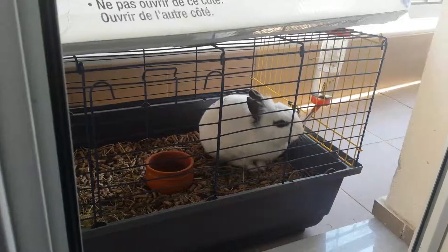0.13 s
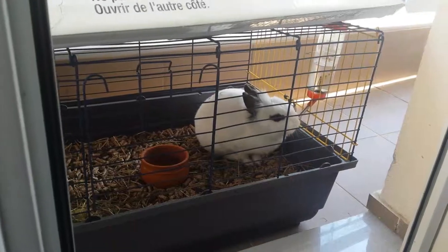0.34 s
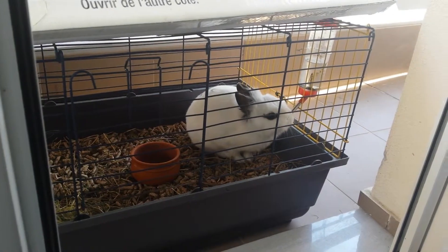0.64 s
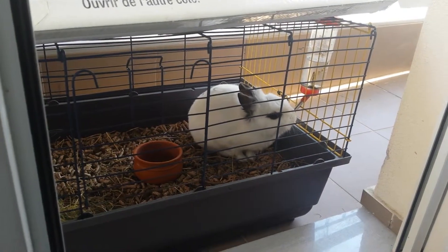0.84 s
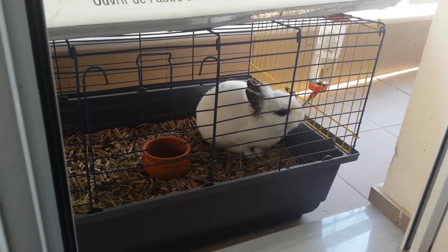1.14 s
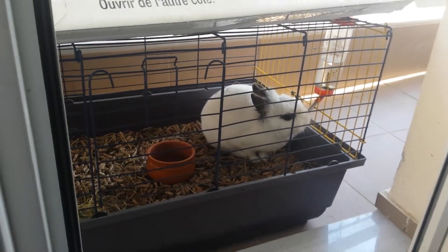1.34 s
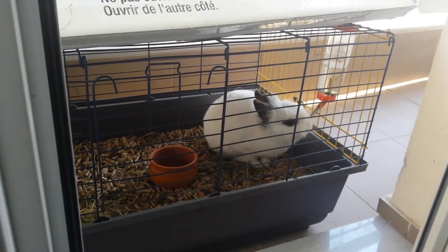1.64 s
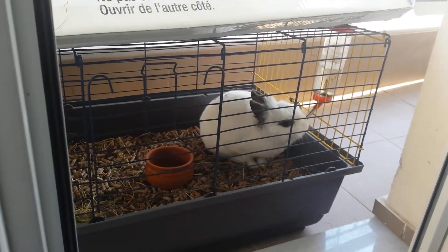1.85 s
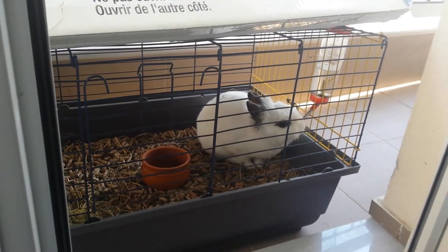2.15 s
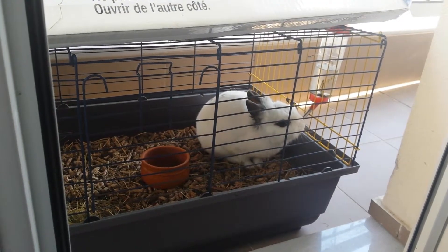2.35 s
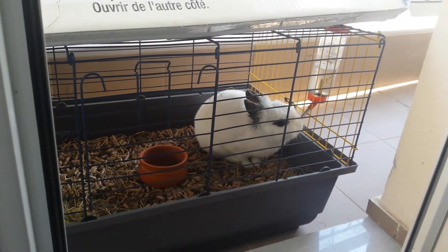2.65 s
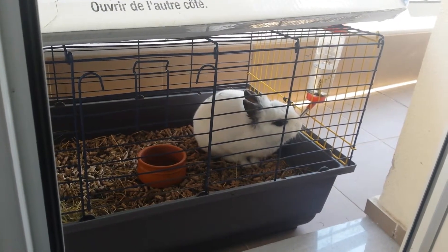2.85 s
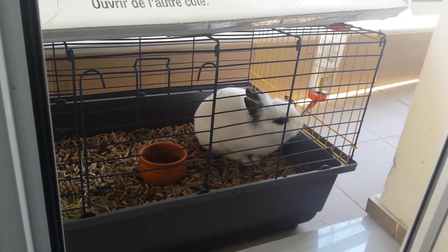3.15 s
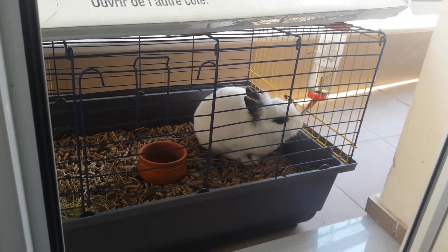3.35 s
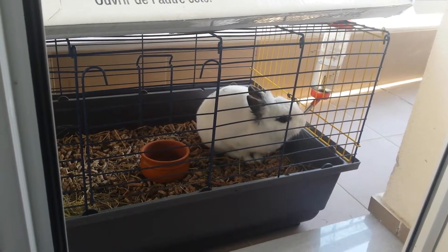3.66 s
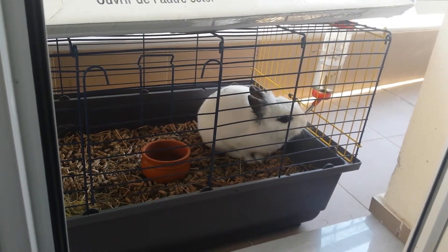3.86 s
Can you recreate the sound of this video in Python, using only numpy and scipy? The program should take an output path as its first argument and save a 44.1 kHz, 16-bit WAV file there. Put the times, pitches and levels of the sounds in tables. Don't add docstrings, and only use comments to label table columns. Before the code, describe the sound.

A rabbit licks a metal bottle spout in its cage. Silence until 0.4 s, then faint low traffic rumble and engine hum fade in. A sharp click at 0.7 s leads into light irregular ticks until 1.2 s. From about 1.6 s bright metallic knocks come five or six a second, many doubled by the ball dropping back, until 3.65 s; one faint tick follows at 3.8 s. Short hard balcony echo, stronger on the right.

```python
import sys
import numpy as np
from scipy import signal
from scipy.fft import rfft, irfft, next_fast_len
from scipy.io import wavfile
from scipy.ndimage import map_coordinates

SR = 44100
rng = np.random.default_rng(int(sys.argv[2]) if len(sys.argv) > 2 else 0)


def to_wav(s):
    ch = np.atleast_2d(s).T
    pcm = np.round(np.clip(ch, -1, 1) * 32767)
    wavfile.write(sys.argv[1], SR, pcm.astype(np.int16))


def gain_from_db(level_db):
    decades = np.asarray(level_db, float) / 20
    return 10 ** decades


N = 176400


def along(points, hz):
    point_hz, value = np.transpose(points)
    return np.interp(np.log(hz + 1), np.log(point_hz + 1), value)


def curves(rows):
    time_s, *columns = np.transpose(rows)
    return [np.interp(np.arange(N) / SR, time_s, column) for column in columns]


def wobble(rate_hz, size=N):
    knots = rng.standard_normal(int(size * rate_hz / SR) + 4)
    return map_coordinates(knots, [np.arange(size) * rate_hz / SR])


def filtered(x, response):
    size = next_fast_len(N + SR // 2)
    spectrum = rfft(x, size) * response(np.fft.rfftfreq(size, 1 / SR))
    return irfft(spectrum, size)[..., :N]


def ringing(peaks):
    def response(f):
        total = 0
        for k, (hz, width_hz, level_db) in enumerate(peaks):
            damping = 1j * f * width_hz
            total = total + (-1) ** k * gain_from_db(level_db) * damping / (hz * hz - f * f + damping)
        return total
    return response


# pitch_hz, correlation [0-1]
PORT_LIKENESS = [(130, 0.99), (290, 0.94), (550, 0.58), (900, 0.91), (1400, 0.067), (3100, 0.25),
                 (7000, 0.035)]
# pitch_hz, left_over_right_db
PORT_TILT = [(130, -2), (290, -0.5), (640, -1), (1400, -4), (4000, -6), (5500, -8), (7000, -22.5),
             (10000, -5)]


def paired(response):
    def mid_side(hz):
        angle = np.arccos(np.clip(along(PORT_LIKENESS, hz), -1, 1)) / 2
        return response(hz) * [np.cos(angle), np.sin(angle)]

    def tilt(hz):
        return gain_from_db(np.outer([.5, -.5], along(PORT_TILT, hz)))

    mid, side = filtered(rng.standard_normal((2, N)), mid_side)
    pair = filtered(np.array([mid + side, mid - side]), tilt)
    return pair / np.sqrt(np.mean(pair.mean(0) ** 2))


# time_s, level_db
TRAFFIC = [(0.7, -43), (0.8, -42.5), (1.55, -43), (1.81, -44.5), (2.09, -43.5), (2.45, -44), (3.7, -45),
           (4.0, -44.5)]
# pitch_hz, level_db (per Hz)
RUMBLE = [(20, -12), (36, -20), (60, -5), (130, -0.5), (167, -5), (275, -12), (333, -12), (600, -30.5),
          (1300, -120)]
TYRES = [(260, -16), (450, -3), (589, -3), (976, -1), (1290, -7), (1420, -5), (1720, -10), (2390, -9),
         (3600, -23), (4680, -86), (7920, -120)]
AIR = [(1880, -19), (3200, -8), (5570, -8.5), (7010, -3.5), (9490, -12.5), (11600, -17), (14000, -16),
       (14900, -18), (15400, -58)]
# pitch_hz, width_hz, level_db
DRONES = [(113.8, 9.1, -55), (223.4, 14.6, -60), (331, 14.4, -61.5), (392.5, 25, -63.5),
          (529.6, 8.2, -69.5), (737, 22, -70), (1183, 5.6, -75), (1463, 4.8, -75.5)]


def street():
    tyres_db, air_db, swell_db = -8.5, -11, .5
    level_db, = curves(TRAFFIC)
    rumble = gain_from_db(-2.5 + 0.87 * wobble(5.7)) * paired(lambda hz: gain_from_db(along(RUMBLE, hz)))
    tyres = gain_from_db(tyres_db + swell_db * wobble(5.1)) * paired(lambda hz: gain_from_db(along(TYRES, hz)))
    air_level = gain_from_db(level_db.mean() + air_db + swell_db * wobble(8))
    air = air_level * paired(lambda hz: gain_from_db(along(AIR, hz)))
    drones = 0
    for pitch_hz, width_hz, drone_db in DRONES:
        drone = paired(lambda hz: 1 / (1 + ((hz - pitch_hz) / width_hz * 2) ** 2))
        drones = drones + gain_from_db(drone_db) * drone
    return gain_from_db(level_db) * (rumble + tyres) + air + drones


# time_s, pitch_hz, level_db
ENGINE = [(0.55, 151.7, -43.5), (0.57, 152.9, -40.5), (0.7, 149.7, -46), (0.95, 142.2, -47.5),
          (1.11, 151.2, -113), (1.3, 153, -57), (1.45, 141.1, -56.5), (1.79, 150, -55), (2.28, 146.8, -48),
          (2.41, 138.8, -52.5), (2.68, 145.1, -60), (2.8, 140.2, -53), (2.98, 139.3, -44.5),
          (3.11, 145.2, -75), (3.38, 144.1, -41.5), (3.54, 154.8, -73), (3.62, 146, -53),
          (4.0, 139.2, -51.5)]


def engine():
    pitch_hz, level_db = curves(ENGINE)
    tone = gain_from_db(level_db) * np.sin(2 * np.pi * np.cumsum(pitch_hz) / SR)
    hum_level = gain_from_db(-59.5 + 1.1 * wobble(3.83))
    hum_hz = 48.1 + 0.54 * wobble(3.4)
    hum = hum_level * np.sin(2 * np.pi * np.cumsum(hum_hz) / SR)
    return np.sqrt(2) * gain_from_db([[-.9], [.9]]) * (tone + hum)


# pitch_hz, t60_s
BALCONY = [(2000, .16), (7000, 0.25), (14000, 0.023)]


def balcony_tail(size):
    pitch_hz, time_s, bins = signal.stft(rng.standard_normal((2, size)), SR, nperseg=128)
    decay = gain_from_db(-60 * time_s / along(BALCONY, pitch_hz)[:, None])
    tail = signal.istft(bins * decay, SR, nperseg=128)[1][:, :size]
    return np.roll(tail / np.linalg.norm(tail[0]), SR // 300, axis=1)


RATTLE_T60_S = (0.034, 0.064, 0.011, 0.015)
LEFT_DB = (-11.5, -15.5, -22, -4)
BALCONY_DB = (-9.5, -10, -9, 3)


def contact(ring_db, clink_db, short, size):
    neck_db, tube_db, ball_db, cage_db = 1, 8.5, 2.5, -9.5
    crack, crack_s = (0.88, 0.59, .4, 0.42), .0012
    rise_s, lump_db, ports_alike = .0007, 3.5, 0.47
    t = np.arange(size) / SR
    shared = rng.standard_normal((4, 1, size))
    own = rng.standard_normal((4, 2, size))
    noise = np.sqrt(ports_alike) * shared + np.sqrt(1 - ports_alike) * own
    lumps = gain_from_db(lump_db * wobble(910, size=size)) * (1 - np.exp(-t / rise_s))
    tail = balcony_tail(size)
    part_db = (neck_db, tube_db + ring_db, ball_db + clink_db, cage_db / short)
    heard = np.zeros((4, 2, size))
    for part in range(4):
        shape = lumps * gain_from_db(-60 * t / (short * RATTLE_T60_S[part]))
        rattle = noise[part] * shape / np.linalg.norm(shape)
        rattle[:, round(crack_s * SR)] += crack[part]
        echo = signal.fftconvolve(rattle[1:], tail, axes=1)[:, :size]
        both = rattle + short * gain_from_db(BALCONY_DB[part]) * echo
        heard[part] = gain_from_db(part_db[part]) * gain_from_db([[LEFT_DB[part]], [0]]) * both
    return heard


# start_s, peak_db, tube_ring_db and bright_clink_db (over the peak)
KNOCKS = [(0.6718, -27.5, -3, -20), (1.2215, -38, -1.5, -11), (1.3453, -33.5, -2, -13),
          (1.593, -39.5, -1, -11), (1.7686, -34.5, 0, -10), (1.9453, -32, -0.5, -6.5),
          (2.1222, -31.5, -0.5, -19), (2.2977, -36.5, 1, -12), (2.5226, -33, -3, -14),
          (2.7159, -32, -3.5, -13), (2.9345, -37.5, -3.5, -17.5), (3.0716, -34, -3.5, -18),
          (3.255, -34.5, -1, -10), (3.4304, -30.5, -1.5, -13.5), (3.6022, -33, -1, -14)]
# start_s, peak_db, tube_ring_db (over the peak)
DROPS = [
    (1.7945, -33.5, -6),
    (1.9766, -31, -5.5),
    (2.153, -32, -9.5),
    (2.3288, -33.5, -10.5),
    (2.5595, -39, -6.5),
    (3.109, -33.5, -6.5),
    (3.285, -31.5, -4),
    (3.461, -30.5, -6.5),
    (3.6396, -34, -8),
]
# start_s, peak_db
TOUCHES = [(0.5107, -114), (0.6542, -45), (0.7736, -51), (0.8353, -44.5), (0.8798, -46), (0.949, -37.5),
           (1.0114, -43.5), (1.056, -41.5), (1.1363, -44.5), (1.8916, -62), (3.8247, -46)]
# start_s, peak_db
GRAZES = [
    (1.044, -37),
    (2.9445, -38),
    (3.1291, -30.5),
]
# pitch_hz, width_hz, level_db
NECK = [(2000, 1200, -19), (3100, 550, -10), (4330, 540, 0), (5300, 1100, -6)]
TUBE = [(6358, 650, -2), (7170, 400, 1.5), (8220, 150, -3), (8580, 320, -5), (9480, 2100, -19)]
BALL = [(9560, 3600, -2.5), (12600, 340, 7.5), (13230, 1230, 2), (14700, 1300, -26)]
CAGE = [(2200, 3100, -4), (5100, 6400, -7), (8950, 3000, -18)]


def spout():
    # start_s, peak_db, ring_db, clink_db, rattle length over a knock's
    contacts = [(*row, 1) for row in KNOCKS]
    contacts += [(s, db, ring_db, -35, .75) for s, db, ring_db in DROPS]
    contacts += [(s, db, -11, -32, .35) for s, db in TOUCHES]
    contacts += [(s, db - 18, 18 - 8.5, -11, .2) for s, db in GRAZES]
    size = SR // 4
    drive = np.zeros((4, 2, N + 2 * size))
    for start_s, peak_db, ring_db, clink_db, short in contacts:
        start = round(start_s * SR)
        drive[:, :, start:start + size] += gain_from_db(peak_db + 29) * contact(ring_db, clink_db, short, size)
    parts = zip(drive, (NECK, TUBE, BALL, CAGE))
    neck, tube, ball, cage = (filtered(d[:, :N], ringing(peaks)) for d, peaks in parts)
    soft = signal.butter(4, 11100, fs=SR, output="sos")
    return ball + signal.sosfilt(soft, neck + tube + cage)


def scene():
    return street() + engine() + spout()


def low_pass(x):
    return signal.sosfilt(signal.butter(12, 16400, fs=SR, output="sos"), x)


def record(dry):
    fade_from_s, fade_s, fade_bend = 0.41, 0.3, 1.035
    edge_hz, above_edge_db = 14450, -24
    fade = np.clip((np.arange(N) / SR - fade_from_s) / fade_s, 0, 1) ** fade_bend
    limited = filtered(dry * fade, lambda hz: gain_from_db(above_edge_db * np.clip((hz - edge_hz) / 150, 0, 1)))
    finished = limited * (fade > 0)
    return low_pass(finished)


dry = scene()
out = record(dry)
to_wav(out)
```